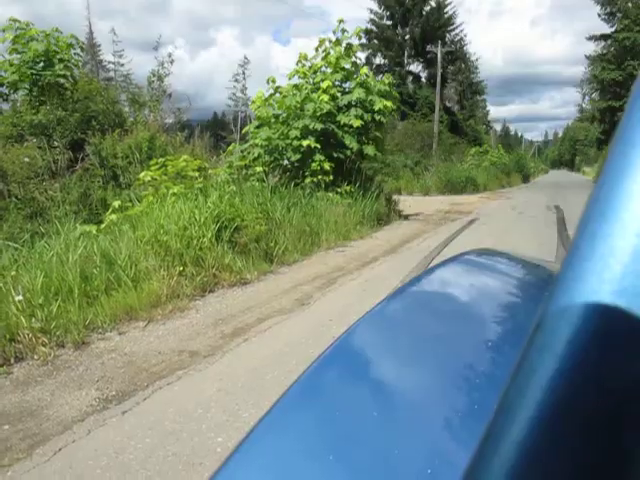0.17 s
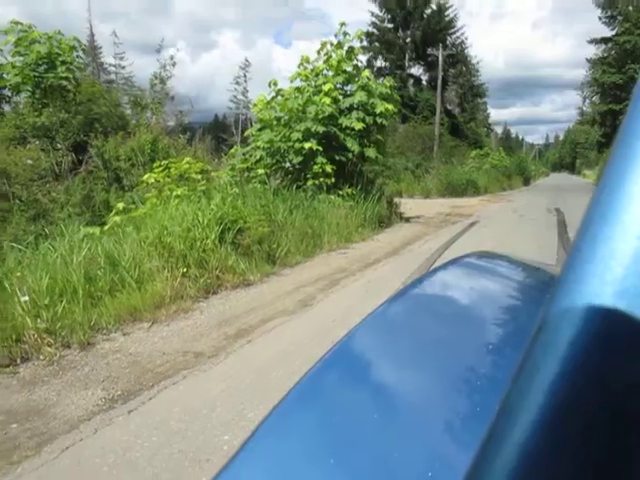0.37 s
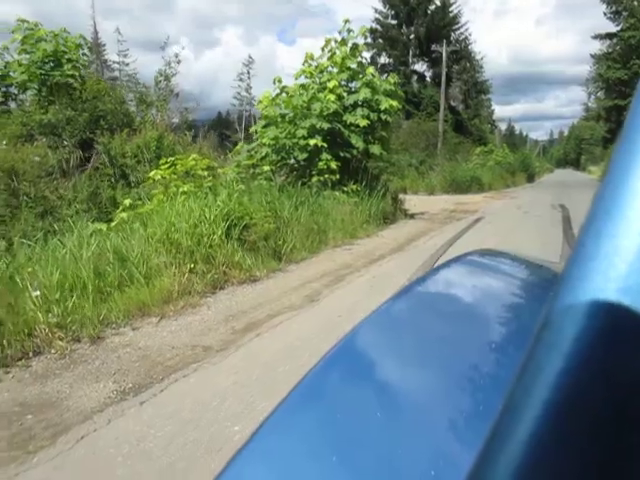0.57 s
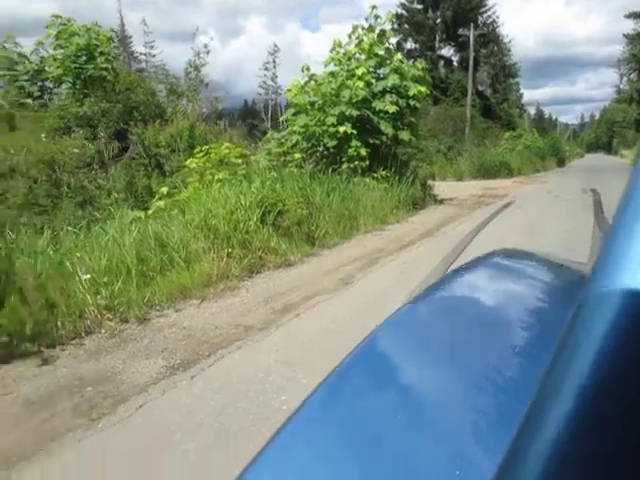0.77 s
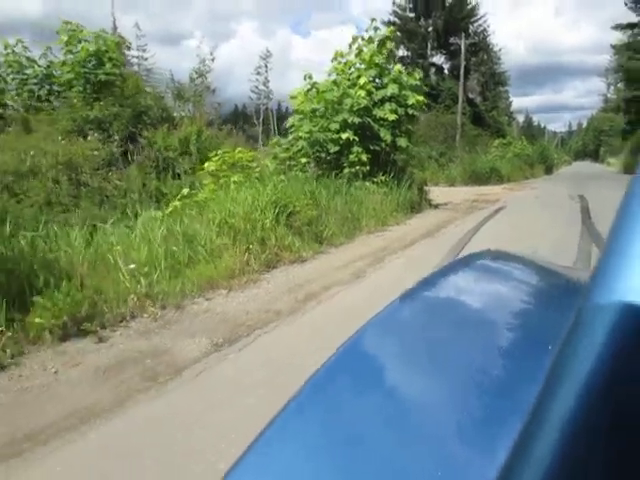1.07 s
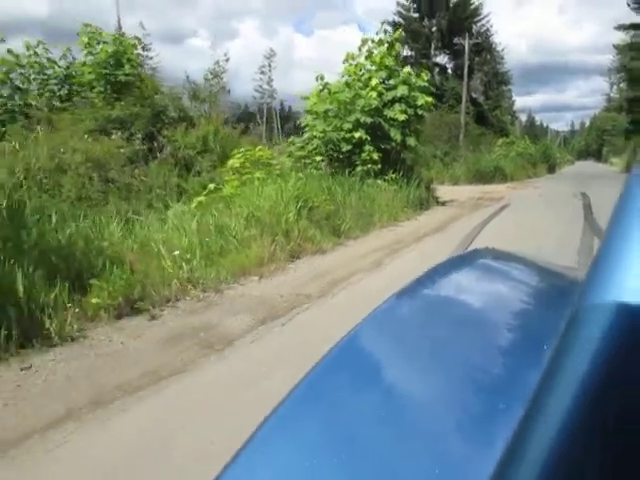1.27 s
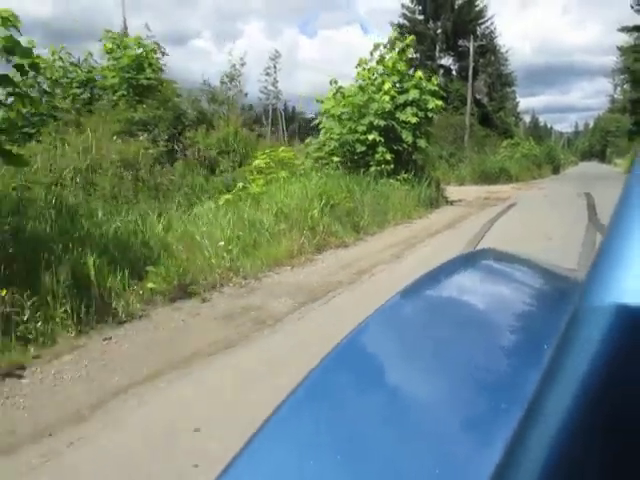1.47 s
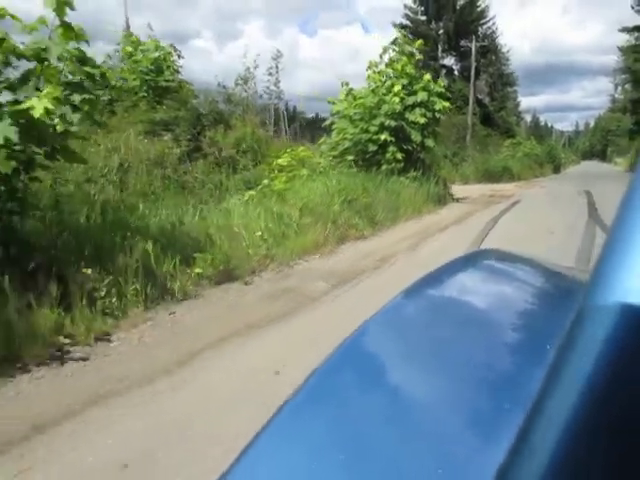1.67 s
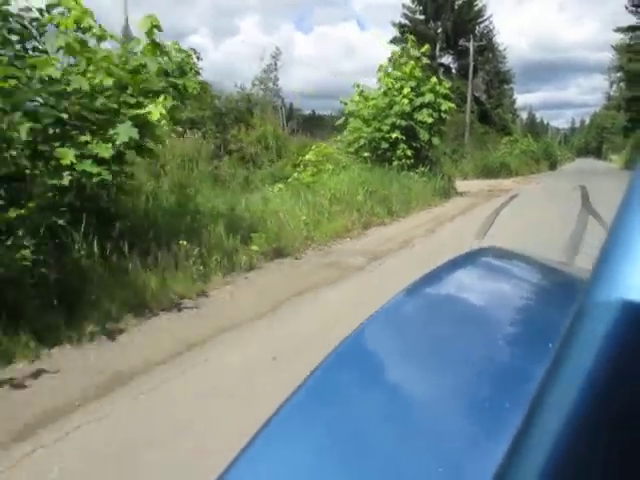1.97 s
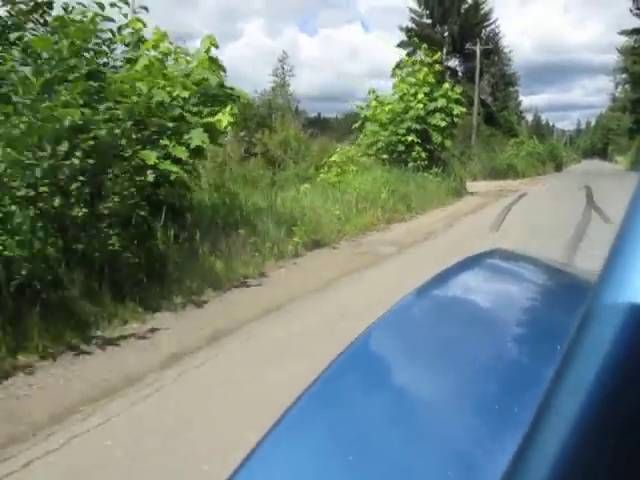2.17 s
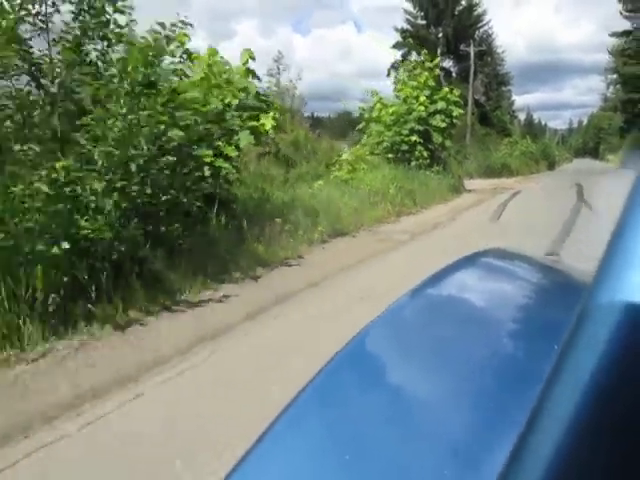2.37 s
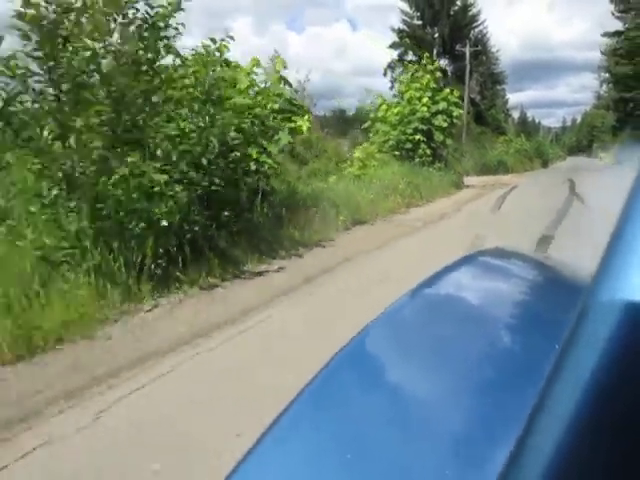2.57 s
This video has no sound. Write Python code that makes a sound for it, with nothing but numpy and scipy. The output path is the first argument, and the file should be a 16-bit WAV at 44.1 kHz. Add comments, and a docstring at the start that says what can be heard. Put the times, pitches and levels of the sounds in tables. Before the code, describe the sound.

Heard from the side of a car on a rural road, the engine rises from a throaty burble to a sustained roar. Tyre and air hiss grow with it, joined by wind gusts, light exhaust pops and scattered cracks.

```python
"""Eight-cylinder car pulling away

Heard from the side of the car on a country road, the exhaust burbles; then the throttle opens and the
revs double to a held roar. Uneven firings make a harmonic drone, strike the exhaust's resonances and
release turbulent puffs that rasp on every cycle. Gusts buffet the microphone, tyres and air hiss,
and a few sharp ticks and cracks cut through."""
import sys
import numpy as np
from scipy import signal
from scipy.fft import rfft, irfft
from scipy.io import wavfile
from scipy.ndimage import uniform_filter1d

SR = 44100
rng = np.random.default_rng(int(sys.argv[2]) if len(sys.argv) > 2 else 0)


def bounce(signal):
    """Save signal as a 16-bit WAV file at the path given by the first command-line argument."""
    frames = np.transpose(np.atleast_2d(signal))
    limited = np.clip(frames, -1, 1)
    pcm = np.round(limited * 32767).astype(np.int16)
    wavfile.write(sys.argv[1], SR, pcm)


N = 119511
TIME = np.arange(N) / SR

# engine speed, one cycle per two crank turns: (time [s], cycle rate [Hz])
SPEED = [(0.07, 25.57), (0.17, 24.89), (0.27, 23.48), (0.39, 22.71), (0.46, 24.86), (0.6, 32.11),
         (0.66, 33.27), (0.76, 33), (1.01, 38.78), (1.17, 42.3), (1.32, 44.86), (1.62, 46.1), (1.79, 47.3),
         (1.98, 46.97), (2.15, 45.66), (2.48, 46.03), (2.6, 45.6), (2.71, 45.44)]
def crankshaft():
    """Phase is the integral of frequency: gives the cycle rate and the cycles elapsed."""
    rate, = in_time(SPEED)
    return rate, np.cumsum(rate) / SR


# how hard the engine works: (time [s], load [0-1], drone gain [dB])
LOAD = [(0.07, 0.16, -3), (0.3, 0.24, -1.3), (0.42, 0.03, -3.1), (0.62, 0.14, -2), (0.9, 0.26, -0.7),
        (1.1, 0.1, -1.7), (1.3, 0.27, -1.2), (1.42, 1.0, 0.5), (1.58, 0.7, -0.3), (1.73, 0.33, 0.5),
        (1.92, 0.8, -0.6), (2.05, 0.29, -0.5), (2.7, 0.34, -0.7)]
# the eight firings in turn: (pressure pulse [0-1], relative rasp at full load [dB])
CYLINDERS = [(0.62,-2),(0.57,1),(0.06,-4),(0.72,-6),(0.45,-8.5),(0.12,-6.5),(0.92,-4.5),(0.29,-4)]
# harmonics before the pipe: (order [multiple of cycle rate], light-load level [dB], full-load level [dB])
ORDERS = [(1,-57.5,-41),(2,-49,-39.5),(4,-37,-26.5),(5,-15,-44),(6,-40.5,-24.5),(7,-87,-27),(9,-31.5,-29.5),(10,-24.5,-42),(11,-35.5,-26.5),(12,-32.5,-79),(13,-26.5,-49.5),(14,-36,-55),(15,-41.5,-35.5),(16,-36,-53),(17,-36,-44.5),(19,-35,-61.5),(22,-41.5,-37.5),(23,-55,-45.5),(24,-45,-48)]
# exhaust pipe response: (frequency [Hz], gain [dB])
PIPE = [(40.0, 10.5), (75.0, 2), (115.0, 2.9), (170.0, 2.25), (215.0, -9), (270.0, 1.5), (330.0, -2.5),
        (400.0, -4), (460.0, 8), (540.0, -2), (600.0, 8.5), (680.0, 0.5), (800.0, 2.5)]
# the two leading harmonics: (time [s], order 3 level [dB], order 8 level [dB])
BURBLE = [(.11,-19.5,-29),(.32,-23.5,-27),(.42,-40,-23),(.56,-25.5,-26),(.78,-26,-25),(.95,-23.5,-31),(1.1,-26.5,-28.5),(1.28,-24.5,-23.5),(1.6,-28,-27.5),(1.95,-28,-28),(2.15,-25,-25.5),(2.7,-26,-26)]
FIRING_OFFSET_CYCLES = .02
def drone(rate, cycles, gust):
    """Fourier series: uneven firings sound harmonics of the cycle rate, which flutter more in gusts."""
    load, load_db = in_time(LOAD)
    pulse = np.array(CYLINDERS)[:, 0]
    place = FIRING_OFFSET_CYCLES + np.arange(len(pulse)) / len(pulse)
    levels = [(order, light + (full - light) * load + load_db + at_hz(PIPE, order * rate))
              for order, light, full in ORDERS]
    levels += zip((3, 8), in_time(BURBLE))
    flutter, flutter_hz = .053 + .3 * gust, 21
    out = 0
    for order, db in levels:
        phase = np.angle(np.sum(pulse * np.exp(-2j * np.pi * order * place)))
        angle = 2 * np.pi * order * cycles + phase
        tone = (1 + flutter * drift(flutter_hz)) * np.cos(angle)
        tone += flutter * drift(flutter_hz) * np.sin(angle)
        out += from_db(db) * tone * np.sqrt(2 / (1 + 2 * flutter ** 2))
    return out


def firings(cycles, idle_unevenness=.27, scatter_db=1.52, decay_intervals=1.56):
    """A pulse train, more uneven under load: onset samples, strengths and the envelope of gas puffs."""
    beat = (cycles - FIRING_OFFSET_CYCLES + 1) * len(CYLINDERS)
    number = beat.astype(int)
    unevenness = idle_unevenness + (1 - idle_unevenness) * in_time(LOAD)[0]
    cylinder_db = unevenness * np.array(CYLINDERS)[number % len(CYLINDERS), 1]
    strength = from_db(cylinder_db + scatter_db * rng.standard_normal(number[-1] + 1)[number])
    strength /= np.sqrt(uniform_filter1d(strength ** 2, size=4000))   # steady running power
    puffs = uniform_filter1d(strength * np.exp(-(beat % 1) / decay_intervals), size=16)
    onsets = np.flatnonzero(np.diff(number)) + 1
    return onsets, strength[onsets], rms_one(puffs)


# rasp envelope: (time [s], base level [dB])
RASP_LEVEL = [(.09,-39.5),(.43,-39),(.6,-32),(.76,-29.5),(.88,-30.5),(1.0,-27),(1.45,-27.5),(1.58,-29.5),(1.7,-25.5),(1.8,-28.5),(2.4,-27.5),(2.7,-28.5)]
# turbulent gas spectrum: (frequency [Hz], relative density [dB])
RASP_SPECTRUM = [(350, -21.5), (550, -4.5), (750, -2.5), (1400, 0.5), (2150, -5), (2500, -11),
                 (3300, -13.5), (4500, -19.5), (8000, -41.5)]
# exhaust resonances: (frequency [Hz], bandwidth [Hz], gain [dB])
EXHAUST_MODES = [(786, 120, -3.5), (1115, 66, -6.5), (1340, 230, -2), (1800, 96, -1), (2117, 88, -7.5)]
def rasp(onsets, strength, puffs, jitter_s=.00006, bark_db=-7.5, turbulence_db=1.5):
    """Impulse excitation: each firing strikes the exhaust's modes and lets out turbulent gas."""
    jitter = (jitter_s * SR * rng.standard_normal(len(onsets))).astype(int)
    impulses = np.zeros(N)
    impulses[np.clip(onsets + jitter, 0, N - 1)] = strength
    bark = sum((-1) ** k * from_db(db) * resonate(impulses, hz, width)
               for k, (hz, width, db) in enumerate(EXHAUST_MODES))
    bark = signal.sosfilt(signal.butter(2, 600, "high", fs=SR, output="sos"), bark)
    turbulence = from_db(turbulence_db) * puffs * coloured(RASP_SPECTRUM)
    return envelope(RASP_LEVEL) * (from_db(bark_db) * rms_one(bark) + turbulence)


# hollow ring that swells twice as the revs climb and returns at the held roar: (time [s], level [dB])
RING_LEVEL = [(.5,-49),(.63,-46),(.70,-27.5),(.86,-28),(.97,-38),(1.12,-27),(1.3,-42),(1.95,-35),(2.12,-32),(2.7,-31.5)]
# boom of the body at the lowest revs: (time [s], level [dB])
BOOM_LEVEL = [(.07,-42),(.16,-30.5),(0.328,-21.5),(.42,-31),(.7,-48)]
def resonances(puffs, pulse_to_noise=1.6):
    """Forced resonance: puffs and their turbulence sustain a ring, its overtone and the body's boom."""
    def mode(hz, width_hz):
        drive = puffs * (pulse_to_noise + rng.standard_normal(N))
        return rms_one(resonate(resonate(drive, hz, width_hz), hz, width_hz))

    ring = envelope(RING_LEVEL) * mode(hz=1072, width_hz=106)
    boom = envelope(BOOM_LEVEL) * mode(hz=453, width_hz=92)
    overtone = from_db(-9) * envelope(RING_LEVEL) * mode(hz=2160, width_hz=180)
    return ring + boom + overtone


# exhaust pops, loudest under heavy throttle: (time [s], level [dB])
POP_LEVEL = [(.4,-62),(1.1,-44),(1.25,-45),(1.5,-39),(1.76,-38),(1.9,-38),(1.98,-41),(2.08,-51),(2.7,-49)]
# spectrum of a sharp burst: (frequency [Hz], relative density [dB])
BURST_SPECTRUM = [(900,-4),(1600,1),(3100,2.5),(4200,-9),(5700,-8.5),(7500,-7.5),(10500,-20),(11800,-32)]
def pops(rate, cycles, offset_cycles=.14, decay_s=.0064, scatter_db=3):
    """Periodic transients: one cylinder spits an exponentially decaying noise burst every cycle."""
    turn = cycles - offset_cycles + 1
    number = turn.astype(int)
    strength = from_db(scatter_db * rng.standard_normal(number[-1] + 1))[number]
    bursts = strength * np.exp(-(turn % 1) / rate / decay_s)
    return envelope(POP_LEVEL) * rms_one(bursts * coloured(BURST_SPECTRUM))


# ticks and cracks: (time [s], level [dB], pitch [Hz], relative spray level [dB])
CRACKS = [(0.34,-34,4170,-1),(0.782,-23,2620,-6),(1.4871,-22.5,2156,-9),(1.534,-29,3072,-10),(1.835,-34,2900,-24),(1.8986,-26,3086,-18),(2.438,-19.5,847,-20),(2.461,-31,2852,-7)]
def cracks(decay_s=.0083):
    """Damped transients: a narrow noise band gives each crack its pitch, a wide one its bright spray."""
    out, spray = 0, coloured(HISS_SPECTRUM)
    for onset_s, db, hz, spray_db in CRACKS:
        decay = (TIME >= onset_s) * np.exp(-np.abs(TIME - onset_s) / decay_s)
        ring = rms_one(resonate(coloured(BURST_SPECTRUM), hz, width_hz=340))
        out += from_db(db) * decay * (ring + from_db(spray_db) * spray)
    return out


# gusts on the microphone: (time [s], half length [s], strength [relative])
GUSTS = [(1.056, 0.092, 0.8), (1.356, 0.03, 0.6), (1.646, 0.031, .7), (1.695, 0.03, 0.6),
         (1.861, 0.032, 0.84), (1.99, 0.03, 1.1)]
def gusts():
    """Superposition: Gaussian swells add up to the gust strength."""
    return sum(strength * np.exp(-((TIME - peak_s) / half_s) ** 2) for peak_s, half_s, strength in GUSTS)


# wind spectrum: (frequency [Hz], relative density [dB])
WIND_SPECTRUM = [(20,-12),(45,-5.5),(80,-3.5),(160,-3.5),(300,-5.5),(480,-5),(800,-7.5),(1600,-27.5)]
def wind(gust, steady_db=-31, gust_db=-25.5):
    """Turbulent pressure on the microphone makes a low rumble that swells in each gust."""
    return (from_db(steady_db) + from_db(gust_db) * gust) * coloured(WIND_SPECTRUM)


# hiss of air and tyres: (time [s], level [dB])
HISS_LEVEL = [(.09,-47),(.3,-47),(.41,-48.5),(.49,-42.5),(.6,-40),(.8,-38),(.86,-41),(1.05,-34.5),(1.5,-34.5),(1.98,-34.5),(2.06,-37.5),(2.7,-39)]
# hiss spectrum: (frequency [Hz], relative density [dB])
HISS_SPECTRUM = [(2000, -2.5), (3800, -1.5), (5500, 0), (7000, -3), (8300, 0), (9900, 1.5), (10900, -3),
                 (11700, -26), (12600, -17), (15500, -30)]
def hiss(puffs, depth=.71):
    """Amplitude modulation: the broadband noise of air and tyres pulses with the engine."""
    return envelope(HISS_LEVEL) * rms_one(coloured(HISS_SPECTRUM) * (1 - depth + depth * puffs))


def from_db(db):
    """Amplitude grows tenfold per 20 dB."""
    return 10 ** (np.asarray(db) / 20)


def rms_one(x):
    """Normalisation to unit power."""
    return x / np.sqrt(np.mean(x ** 2) + 1e-20)


def in_time(rows):
    """Linear interpolation of each column at every sample."""
    times, *columns = np.transpose(rows)
    return [np.interp(TIME, times, column) for column in columns]


def envelope(levels):
    """Amplitude envelope from a curve in decibels."""
    return from_db(in_time(levels)[0])


def at_hz(spectrum, hz):
    """Interpolation of a spectrum on a log-frequency axis."""
    frequencies, db = np.transpose(spectrum)
    return np.interp(np.log(hz), np.log(frequencies), db)


def coloured(spectrum):
    """Spectral shaping of white noise, falling 12 dB per octave beyond the table's ends."""
    hz = np.maximum(np.arange(N // 2 + 1) * SR / N, 1)
    skirts = np.minimum(hz / spectrum[0][0], 1) ** 2 * np.minimum(spectrum[-1][0] / hz, 1) ** 2
    return rms_one(irfft(rfft(rng.standard_normal(N)) * from_db(at_hz(spectrum, hz)) * skirts, N))


def drift(hz):
    """Low-pass filtered noise: slow random motion of unit power."""
    pole = np.exp(-2 * np.pi * hz / SR)
    return rms_one(signal.lfilter([1], [1, -2 * pole, pole * pole], rng.standard_normal(N + SR))[SR:])


def resonate(x, hz, width_hz):
    """A damped second-order resonator with unit peak gain."""
    radius = np.exp(-np.pi * width_hz / SR)
    feedback = [1, -2 * radius * np.cos(2 * np.pi * hz / SR), radius ** 2]
    return signal.lfilter(np.array([1, 0, -1]) * (1 - radius ** 2) / 2, feedback, x)


def scene():
    """Superposition: engine, air and road add at one microphone on the car."""
    rate, cycles = crankshaft()
    gust = gusts()
    onsets, strength, puffs = firings(cycles)
    ringing = resonances(puffs)
    engine = drone(rate, cycles, gust) + rasp(onsets, strength, puffs) + pops(rate, cycles) + ringing
    return (engine + hiss(puffs) + wind(gust) + cracks())[None]


START_S, RISE_S, STOPBAND_HZ = .07, .002, 16300
def record(dry):
    """Gating and band limiting: the sound cuts in abruptly and a steep low-pass removes the top."""
    gate = np.clip((TIME - START_S) / RISE_S, 0, 1)
    return signal.sosfilt(signal.cheby2(16, 60, STOPBAND_HZ, fs=SR, output="sos"), dry * gate)


dry = scene()
out = record(dry)
bounce(out)
```